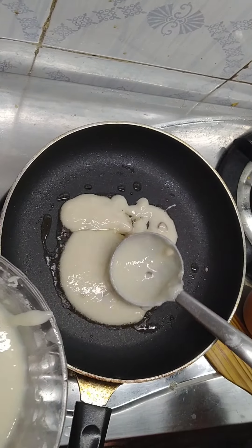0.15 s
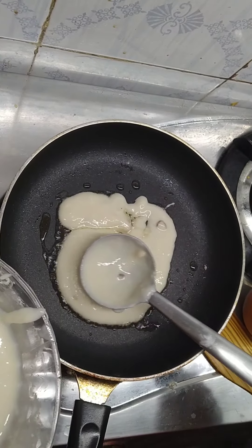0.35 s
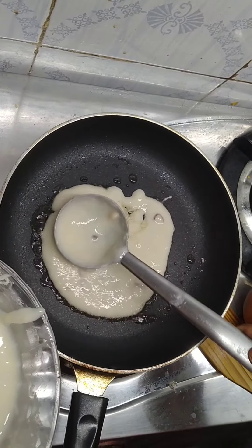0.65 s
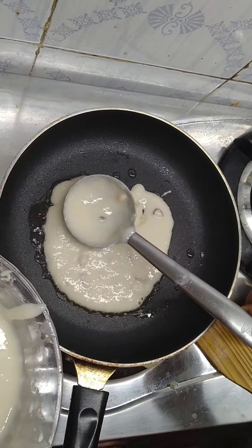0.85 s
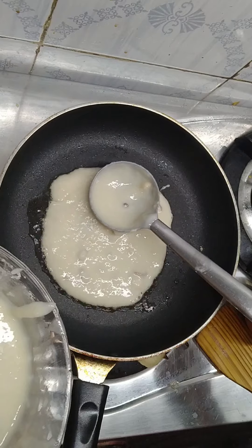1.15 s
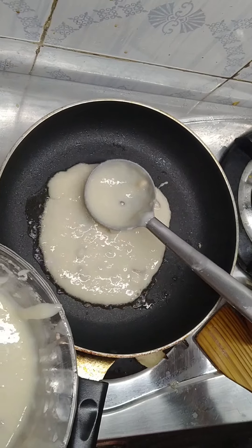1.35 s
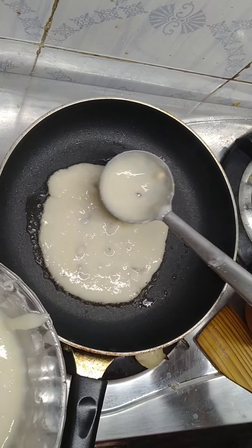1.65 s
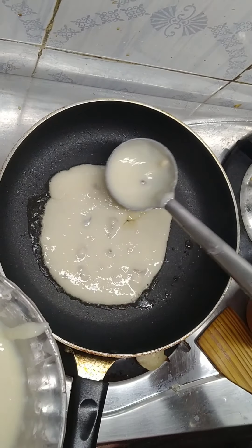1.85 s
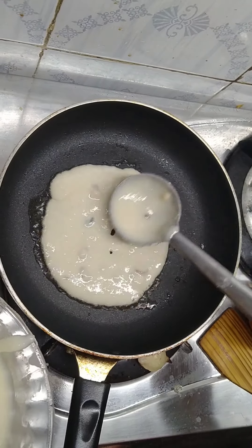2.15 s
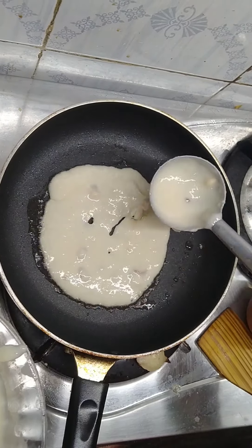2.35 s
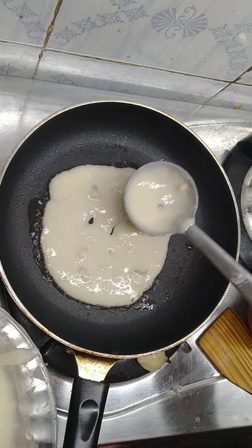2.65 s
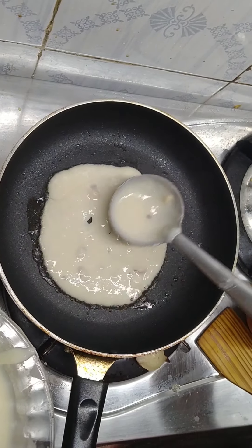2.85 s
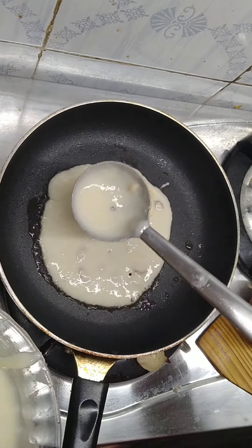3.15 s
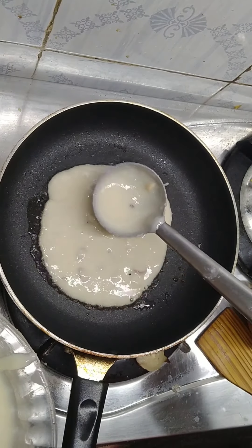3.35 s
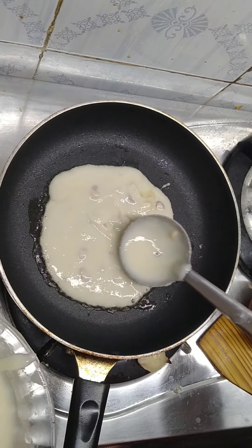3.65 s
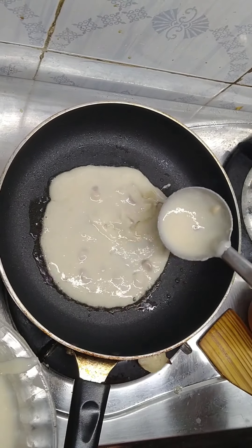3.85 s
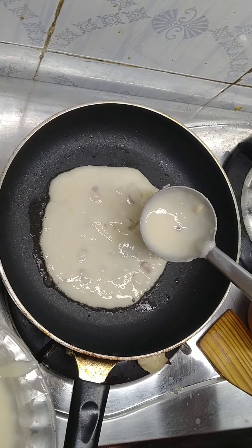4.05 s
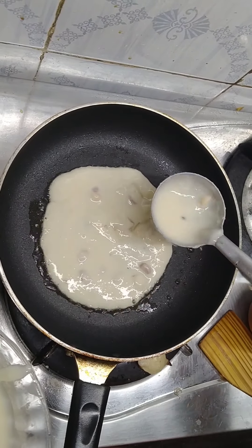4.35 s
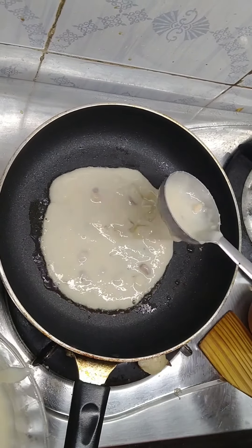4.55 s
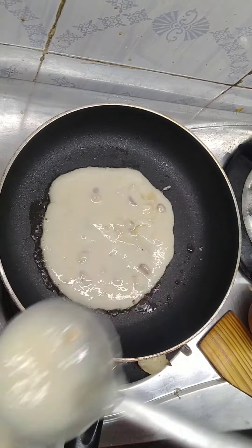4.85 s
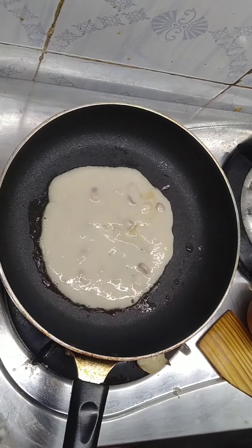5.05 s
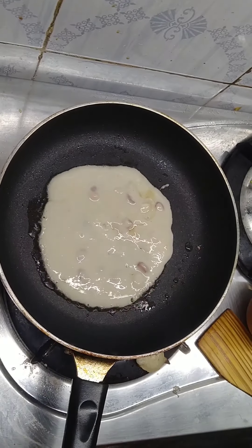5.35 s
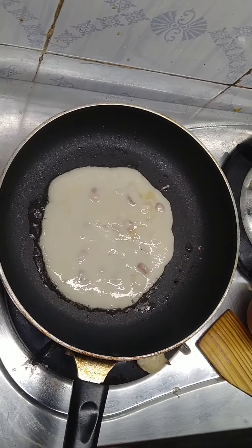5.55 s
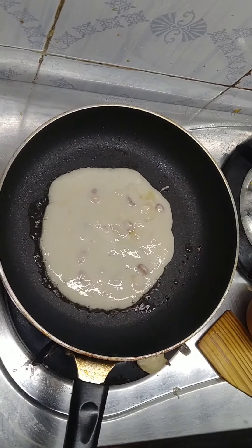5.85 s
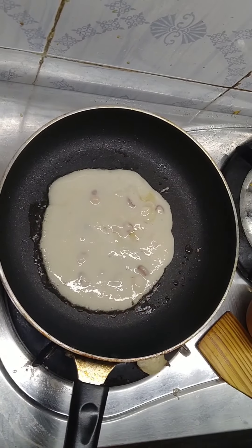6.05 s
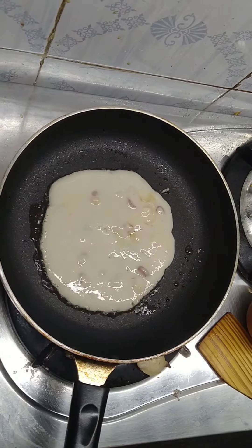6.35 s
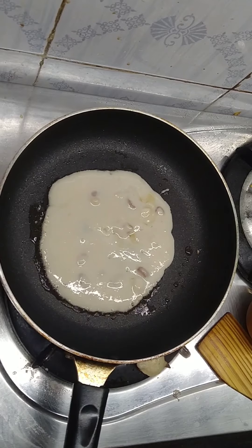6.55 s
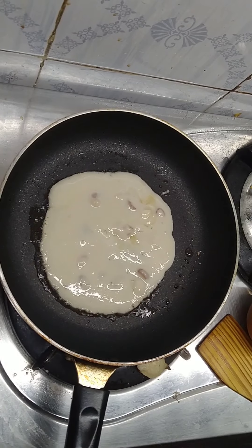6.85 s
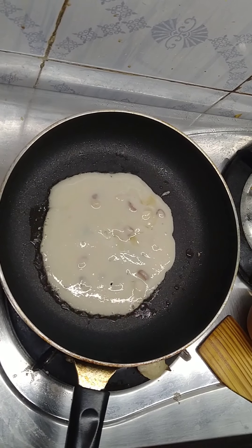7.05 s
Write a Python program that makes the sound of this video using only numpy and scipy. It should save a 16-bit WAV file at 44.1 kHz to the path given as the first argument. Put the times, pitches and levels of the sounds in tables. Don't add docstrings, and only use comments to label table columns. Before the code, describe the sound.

From the start, batter sizzles strongly in hot fat, a dense mid-bright crackle with duller fizz beneath. Short surges at about 0.0, 0.4, 0.8 and 1.1 s follow the ladle's spreading, with soft low wet drags. Small fat pops snap throughout; at 1.3 s a wet blister bursts with by far the sharpest, loudest crack. Broader swells come around 1.8, 2.4 and 3.2 s, with faint hollow gulps, as the sizzle gradually weakens. Two strong spits crack near 4.2-4.3 s, then the frying sinks to a thin, quiet fizz by 5.5 s. At 6.3 s a ladle drops into a steel bowl with a bright, short clank. Dull scuffs follow from 6.5 to 6.8 s, then a sharp tick, handle taps and a scrape at 6.9 s. Sizzle lingers until 7.2 s. A faint flame rush and motor hum continue underneath; the single microphone sounds narrow, with slight tiled-room reflections.

```python
import sys
import numpy as np
from scipy import signal
from scipy.fft import rfft, irfft
from scipy.io import wavfile

SR = 44100
rng = np.random.default_rng(int(sys.argv[2]) if len(sys.argv) > 2 else 0)


def generate_wav(signal):
    frames = np.transpose(np.atleast_2d(signal))
    scaled = np.clip(frames, -1, 1) * 32767
    pcm = np.round(scaled).astype(np.int16)
    wavfile.write(sys.argv[1], SR, pcm)


def magnitude_from_level(level_db):
    exponent = np.asarray(level_db, float) / 20
    return 10 ** exponent


N = 317079

# [s, dB, dB]
HEAT = [
    (0.0, -46.5, -2),
    (0.6, -49.5, 4),
    (1.4, -47, -5),
    (2.0, -49.5, 3.5),
    (2.95, -51, 2),
    (3.5, -51.5, 7.5),
    (4.1, -55.5, 0.5),
    (5.5, -57.5, 3),
    (6.2, -58, -0.5),
    (7.19, -57, -5),
]
# [Hz, dB per Hz]
RIM_SPECTRUM = [(880, -45), (1500, -21), (2000, -16), (2170, -11.5), (2510, -8.5), (3010, 0), (3340, -3.5),
                (3920, -7), (5000, -9.5), (6070, -8.5), (6500, -7.5)]
# [Hz, dB per Hz]
UNDER_SPECTRUM = [(210, -47), (350, -15), (573, -24), (732, -15), (895, -13.5), (959, -9.5), (1560, -7),
                  (2200, -4.5), (2860, -35.5), (4840, -120)]
# [Hz, Hz, dB]
PAN_HUMPS = [(963, 12, 9.5), (2200, 50, 5.5), (2990, 340, -1), (3590, 43, 6.5), (5630, 640, 1.5)]


def rms_one(x):
    return x / np.sqrt(np.mean(x ** 2) + 1e-20)


def peak_one(x):
    return x / np.max(np.abs(x))


def in_time(rows):
    s, *columns = np.transpose(rows)
    return [np.interp(np.arange(N) / SR, s, c) for c in columns]


def colour(x, points, peaks=()):
    size = 8192
    hz = np.arange(size // 2 + 1) * SR / size + 1
    point_hz, point_db = np.array(points).T
    db = np.interp(np.log(hz), np.log(point_hz), point_db)
    for centre_hz, width_hz, peak_db in peaks:
        db = db + peak_db / (1 + (2 * (hz - centre_hz) / width_hz) ** 2)
    cepstrum = irfft(db * np.log(10) / 20)
    cepstrum[1:size // 2] *= 2
    cepstrum[size // 2 + 1:] = 0
    impulse = irfft(np.exp(rfft(cepstrum)))
    return signal.fftconvolve(x, impulse)[:len(x)]


def drift(rate):
    r = np.exp(-2 * np.pi * rate / SR)
    slow = signal.lfilter([1], [1, -2 * r, r * r], rng.standard_normal(N + SR))
    return rms_one(slow[SR:])


def ring(clicks, hz, t60):
    r, w = magnitude_from_level(-60 / (t60 * SR)), 2 * np.pi * hz / SR
    return signal.lfilter([0, np.sin(w)], [1, -2 * r * np.cos(w), r * r], clicks + 1e-18)


def puff(t60, size=4000):
    return rng.standard_normal(size) * magnitude_from_level(-60 * np.arange(size) / SR / t60)


def add(track, s, sound):
    at = round(s * SR)
    track[at:at + len(sound)] += sound[:N - at]


def presses():
    # [s, dB, s, dB, dB]
    strokes = [(0.02, 3, 0.053, -2, 3.5), (0.4, 3.5, 0.064, -3, 1.5), (0.545, 3, 0.063, -1, 5.5),
               (0.78, 4.5, 0.14, -1, 6.5), (1.145, 3, .06, -3.5, 2), (1.343, 1, 0.06, 1.5, 0),
               (1.622, 1, 0.049, 1, 4.5), (1.826, 6.5, 0.14, -4.5, 3.5), (2.416, 5, 0.27, 2.5, 5.5),
               (3.097, 2, .035, 5.5, -2), (3.221, 6.5, .13, -3, 3.5), (3.7, 4, 0.084, -3, 2.5),
               (4.353, 4, 0.23, -2.5, 2), (4.9, 4, 0.15, -1.5, 2), (5.15, 1, 0.12, 0, -2.5),
               (6.685, -0.5, 0.045, 1.5, 1), (7.095, 3, 0.13, -2.5, 1)]
    t = np.arange(0, N + 64, 64) / SR
    s, surge_db, half_s, bright_db, drag_db = np.transpose(strokes)[:, :, None]
    shape = np.exp(-((t - s) / half_s) ** 2)
    return [np.interp(np.arange(N) / SR, t, (db * shape).sum(axis=0)) for db in (surge_db, bright_db, drag_db)]


def surges(per_s, depth, decay_s):
    opened = (rng.random(N) < per_s / SR) * rng.random(N)
    return 1 + depth * signal.lfilter([1], [1, -np.exp(-1 / (decay_s * SR))], opened)


def bursts(per_s, spread_db, low_hz, high_hz, cycles, clump_db, clump_rate):
    sizes = magnitude_from_level(spread_db * np.minimum(rng.exponential(1, N), 4)) * rng.choice([-1, 1], N)
    born = rng.random(N) < per_s * magnitude_from_level(clump_db * drift(clump_rate)) / SR
    dealt = rng.integers(0, 16, N)
    pitches = np.geomspace(low_hz, high_hz, 16)
    return rms_one(sum(ring(sizes * born * (dealt == k), hz, cycles / hz) for k, hz in enumerate(pitches)))


def frying():
    # [Hz, dB per Hz]
    drag_spectrum = [(120, -30.5), (200, 1), (320, -1), (550, -3.5), (800, -28.5)]
    heat_db, cup_db = in_time(HEAT)
    press_db, bright_db, drag_db = presses()
    fizz_db = -64.5 + 1.06 * (heat_db + 51) + 0.3 * press_db
    surge = surges(45, depth=0.7, decay_s=0.0073)

    crackle = bursts(2200, spread_db=1.0, low_hz=1670, high_hz=8700, cycles=17.0, clump_db=3.0, clump_rate=18)
    steam = rng.standard_normal(N)
    sizzle = rms_one(colour(surge * (0.54 * crackle + 0.98 * steam), RIM_SPECTRUM, PAN_HUMPS))
    treble = signal.sosfiltfilt(signal.butter(2, 4300, "high", fs=SR, output="sos"), sizzle)
    cup = rms_one(ring(sizzle, 3084, 0.01))
    thin_films = (magnitude_from_level(bright_db + 5.15) - 1) * treble
    sizzle = sizzle + thin_films + 0.14 * magnitude_from_level(cup_db) * cup

    bubbling = bursts(700, spread_db=-0.5, low_hz=514, high_hz=2500, cycles=8.0, clump_db=2.0, clump_rate=15)
    under_steam = rng.standard_normal(N)
    fizz = rms_one(colour(surge * (0.5 * bubbling + 1.1 * under_steam), UNDER_SPECTRUM, PAN_HUMPS))
    drag = rms_one(colour(rng.standard_normal(N), drag_spectrum))
    return magnitude_from_level(heat_db + press_db + 2.5) * sizzle + magnitude_from_level(fizz_db) * fizz + magnitude_from_level(1.7 * drag_db - 81.1) * drag


def background():
    # [Hz, dB per Hz]
    flame_spectrum = [(60, -13), (85, -2.5), (128, -3), (220, -4), (288, -12), (400, -13.5), (600, -9.5),
                      (900, -19.5), (1300, -41)]
    # [Hz, Hz, dB]
    hum_tones = [(90.5, 6.1, -90.5), (113, 14, -80.5), (148.56, 3.5, -77.5), (242.2, 8.1, -83.5)]
    out = magnitude_from_level(-75.5) * rms_one(colour(rng.standard_normal(N), flame_spectrum))
    for hz, width_hz, db in hum_tones:
        t60 = np.log(1000) / np.pi / width_hz
        out += magnitude_from_level(db) * rms_one(ring(rng.standard_normal(N), hz, t60))
    return out


def small_spits(count=24, over_sizzle_db=10.5, centre_hz=3160):
    heat_s, heat_db, _ = np.transpose(HEAT)
    found = []
    for when, a, b, c in rng.random((count, 4)):
        s = when * N / SR
        peak_db = np.interp(s, heat_s, heat_db) + over_sizzle_db + 4.5 * a
        found.append((s, peak_db, centre_hz * (1.2 + 0.75 * b), 4.0 * c - 8))
    return found


def spits():
    # [s, dB, Hz, dB]
    clear_spits = [(0.1267, -39.5, 2930, 4.5), (0.4628, -29, 3170, 0.5), (0.6996, -28, 3130, 6),
                   (0.7383, -29.5, 3100, -5), (0.977, -28.5, 2880, -10), (1.244, -36, 3060, 2),
                   (1.5493, -32, 3040, 8), (1.723, -33.5, 3080, 5), (1.8731, -34, 2800, 9.5),
                   (2.212, -33, 3700, 2.5), (2.2518, -36, 3140, -5), (2.319, -27.5, 2960, -1),
                   (2.4188, -27, 2820, 1.5), (2.7172, -41.5, 2990, 10.5), (2.7823, -31, 4450, 2.5),
                   (2.9608, -40.5, 5430, 13), (3.0534, -31.5, 5300, 8.5), (3.3785, -35.5, 3020, 6.5),
                   (3.696, -34, 2820, -1), (4.1926, -40, 2900, 1.5), (4.2212, -18.5, 2820, -0.5),
                   (4.311, -21, 2870, -5.5), (4.487, -39.5, 2670, 5), (4.9305, -43.5, 3120, 9.5),
                   (5.129, -37.5, 6280, 8), (5.1627, -40, 3340, 3), (5.5383, -44, 3540, 6.5),
                   (5.6673, -33.5, 2900, 0), (6.8682, -30.5, 3100, -7.5)]
    # [s, Hz, dB]
    gulps = [
        (0.55, 663, -70),
        (0.759, 103, -70.5),
        (2.065, 700, -62),
        (2.82, 1120, -66),
    ]
    out, click = np.zeros(N), np.eye(1, 4000)[0]
    for s, peak_db, hz, crack_db in list(clear_spits) + small_spits():
        spray_t60 = max(0.047 + 0.001 * crack_db, 0.005)
        crack = peak_one(colour(click * 1.33 + puff(spray_t60), RIM_SPECTRUM, PAN_HUMPS))
        note = peak_one(colour(ring(ring(click, hz, 0.0037), hz, 0.0018), RIM_SPECTRUM))
        thud = peak_one(colour(click * 1.7 + puff(0.036), UNDER_SPECTRUM))
        add(out, s, magnitude_from_level(peak_db + 1.0) * (magnitude_from_level(crack_db) * (crack + magnitude_from_level(-27) * thud) + 0.5 * note))
    for s, hz, peak_db in gulps:
        t60 = 60.0 / hz
        add(out, s, magnitude_from_level(peak_db) * peak_one(ring(ring(click, hz, t60), hz, t60)))
    return out


def blister():
    # [s, dB, dB, Hz]
    wet_bursts = [
        (1.291, -13, -33, 5770),
    ]
    out, click = np.zeros(N), np.eye(1, 4000)[0]
    echo_band = signal.butter(2, [4800, 7000], "band", fs=SR, output="sos")
    for s, crack_db, thump_db, hz in wet_bursts:
        push = np.gradient(ring(ring(ring(click, 230, 0.0021), 1440, 0.00054), 1700, 0.0012))
        crack = ring(ring(ring(click, hz * 1.1, 0.00082), hz * 1.1, 0.00087), hz * 1.1, 0.00087)
        echoes = signal.sosfilt(echo_band, puff(0.069))
        bright = magnitude_from_level(crack_db + 2.0) * (peak_one(crack) + 0.33 * echoes)
        add(out, s + 0.00058, bright - magnitude_from_level(thump_db + 14) * peak_one(push))
        add(out, s + 0.004, magnitude_from_level(thump_db - 25) * ring(click, 203, 0.14))
    return out


def struck(modes):
    s, out = np.arange(16000) / SR, 0
    for hz, db, t60, build in modes:
        swell = s * np.exp(-(s / max(build, 2e-4)) ** 2)
        feed = swell * (np.sin(2 * np.pi * hz * s) + 4.2 * rng.standard_normal(len(s)))
        out = out + magnitude_from_level(db) * peak_one(ring(feed, hz, min(t60, 0.4)))
    return out


def ladle():
    # [s, dB]
    knocks = [
        (6.336, -24),
    ]
    # [Hz, dB, s, s]
    bowl_modes = [(105.4, -37, 0.18, .04), (661, -28, 0.15, 0.0062), (730, -28, .09, 0.03),
                  (800, -30, .08, 0.0057), (1010, -24.5, 0.086, 0.0036), (1664, -25, 0.099, .003),
                  (2111, -14, 0.028, 0.027), (2130, -21, .08, .004), (2626, -8.5, 0.042, 0.0013),
                  (2740, -10, 0.017, 0.013), (3120, -15.5, 0.04, 0.0015), (3630, -8.5, 0.062, 0.01),
                  (3664, 0.5, 0.052, 0.0043), (3730, -14, 0.17, 0.0087), (4430, -11.5, 0.029, 0.0014),
                  (5670, -24, 0.05, 0.026), (6330, -14, 0.0073, 0.00078)]
    # [s, dB, Hz, s]
    scuffs = [
        (6.5014, -35.5, 2500, 0.051),
        (6.568, -35.5, 1950, 0.1),
        (6.6554, -41, 2200, 0.038),
        (6.738, -33.5, 2200, 0.099),
        (6.902, -35, 5600, 0.067),
        (6.9204, -22, 5160, 0.0093),
        (6.923, -28.5, 4500, 0.2),
    ]
    # [s, dB]
    handle_taps = [
        (6.919, -35),
        (6.941, -38.5),
    ]
    # [Hz, dB, s, s]
    handle_modes = [(2490, -18, 0.046, 0.0048), (3340, -6.5, 0.045, 0.0063), (3360, -11, 0.067, 0.0091),
                    (3935, -14, .02, .001), (4500, -7, 0.023, 0.00056), (5800, -23, .04, .004)]
    clatter_spectrum = [(400, -43), (700, -8), (2500, -5), (4500, -0.5)]  # (Hz, dB per Hz)
    out = np.zeros(N)
    for s, peak_db in knocks:
        add(out, s, magnitude_from_level(peak_db) * struck(bowl_modes))
        clatter = colour(puff(0.023) + 0.26 * puff(0.32), clatter_spectrum)
        add(out, s + 0.0016, magnitude_from_level(peak_db + 4.5) * peak_one(clatter))
    for s, peak_db, hz, t60 in scuffs:
        wide = signal.butter(1, [hz * 0.58, min(hz * 2.93, 9000)], "band", fs=SR, output="sos")
        scrape = signal.sosfilt(np.r_[wide, wide], puff(max(t60, 0.005), size=9000))
        add(out, s, magnitude_from_level(peak_db - 5.0) * peak_one(scrape))
    for s, peak_db in handle_taps:
        add(out, s, magnitude_from_level(peak_db) * struck(handle_modes))
    return out


def kitchen(x):
    tail = np.r_[np.zeros(round(0.004 * SR)), puff(0.31, size=20000)]
    tail = signal.sosfilt(signal.butter(1, 400, "high", fs=SR, output="sos"), tail)
    return signal.fftconvolve(x, tail / np.sqrt(np.sum(tail ** 2)))[:N]


def scene():
    near = frying() + spits() + blister() + ladle()
    mono = near + magnitude_from_level(-14) * kitchen(near) + background()
    return np.array([mono, mono])


def top_cut(x):
    return signal.sosfilt(signal.butter(12, 15700, fs=SR, output="sos"), x)


def record(dry):
    # [Hz, dB]
    top_edge = [(6400, 0), (6700, -8), (7000, -21), (7450, -25), (7700, -35), (8000, -43), (8300, -58),
                (9000, -75)]
    # [Hz, dB per Hz]
    noise_spectrum = [(55, 26), (80, -30), (6500, -30), (7300, 14), (8300, -4), (9000, -4), (9800, 1)]
    bass_cut = signal.butter(6, 78, "high", fs=SR, output="sos")
    mono = signal.sosfilt(bass_cut, colour(dry[0], top_edge))
    mono = mono + magnitude_from_level(-95) * rms_one(colour(rng.standard_normal(N), noise_spectrum))
    return top_cut(np.array([mono, mono]))


dry = scene()
out = record(dry)
generate_wav(out)
```